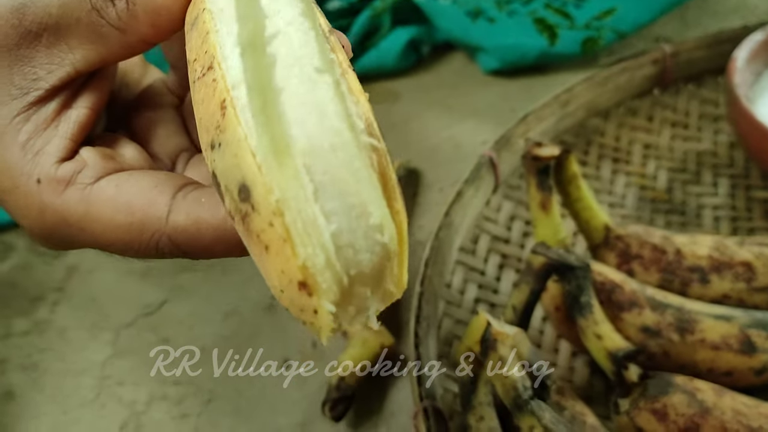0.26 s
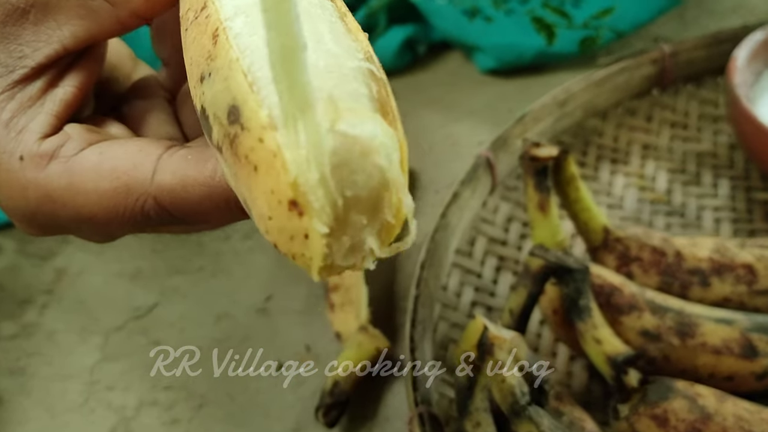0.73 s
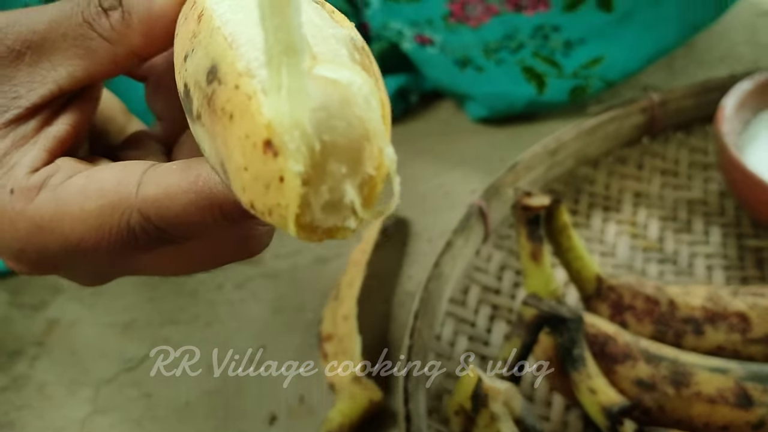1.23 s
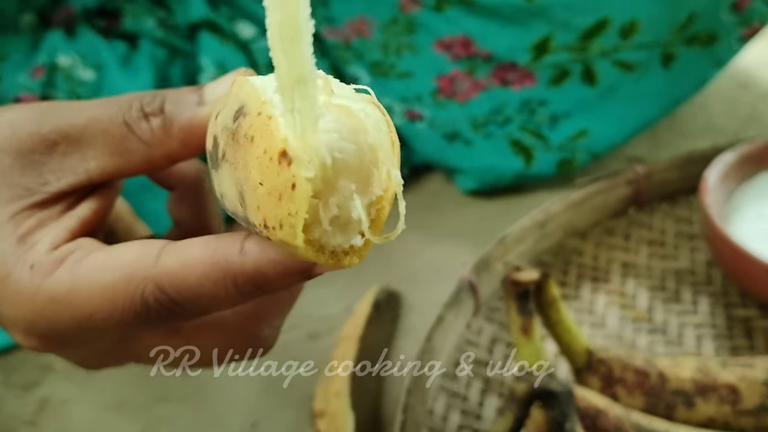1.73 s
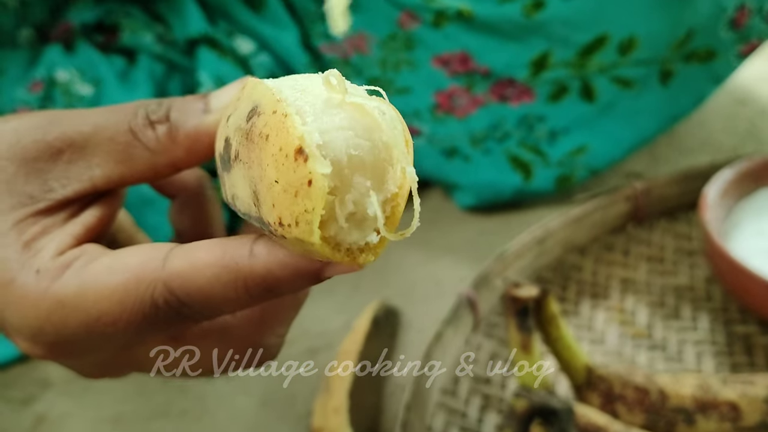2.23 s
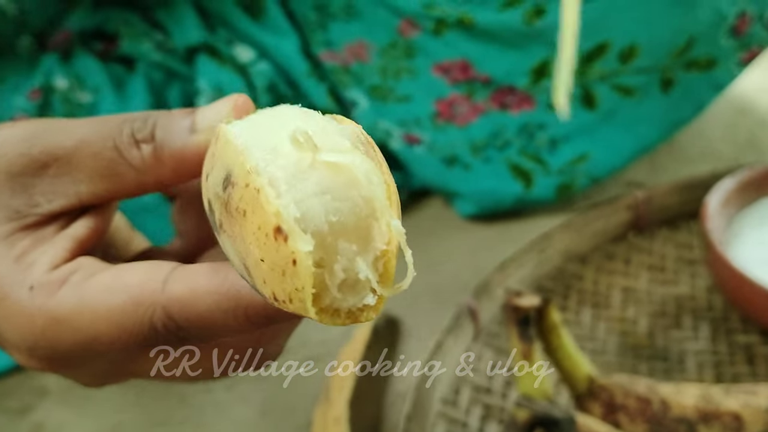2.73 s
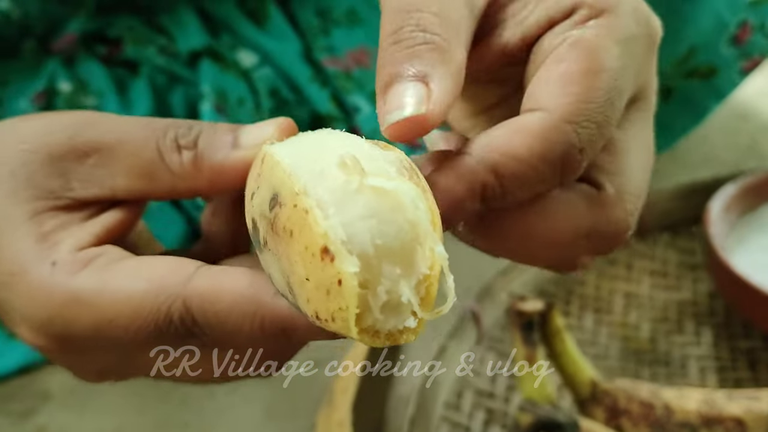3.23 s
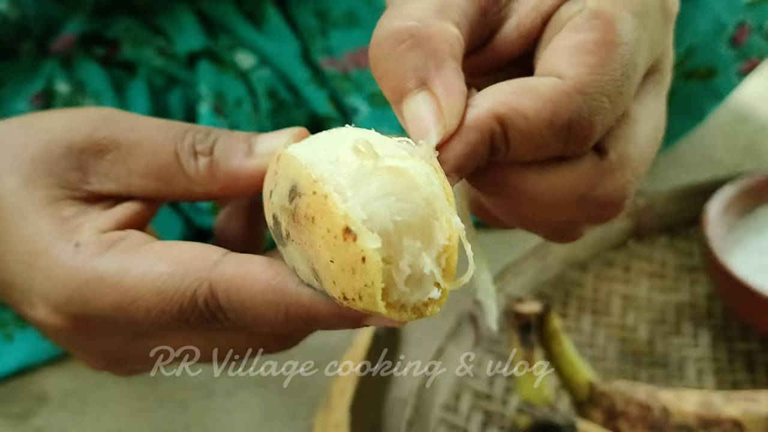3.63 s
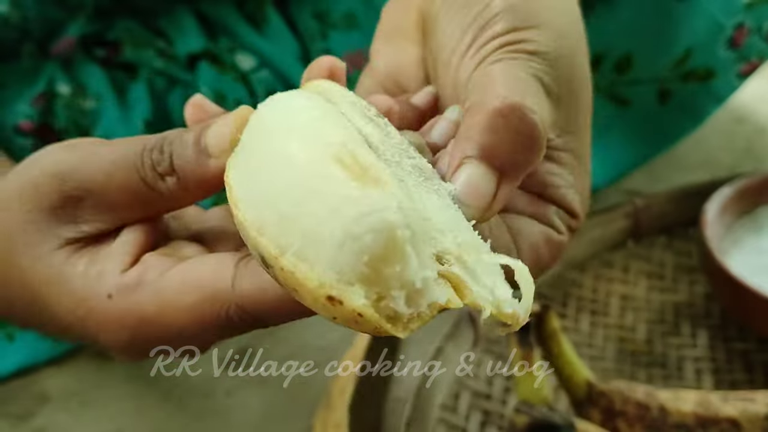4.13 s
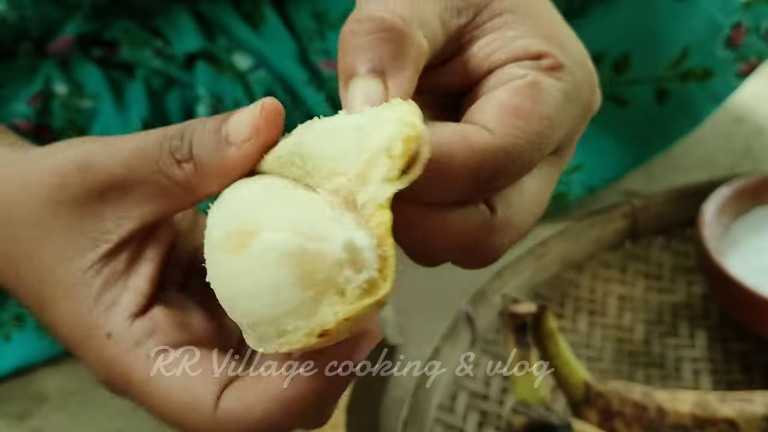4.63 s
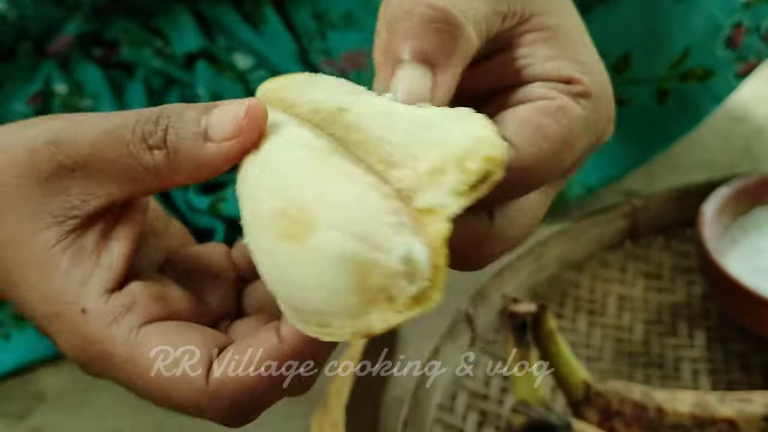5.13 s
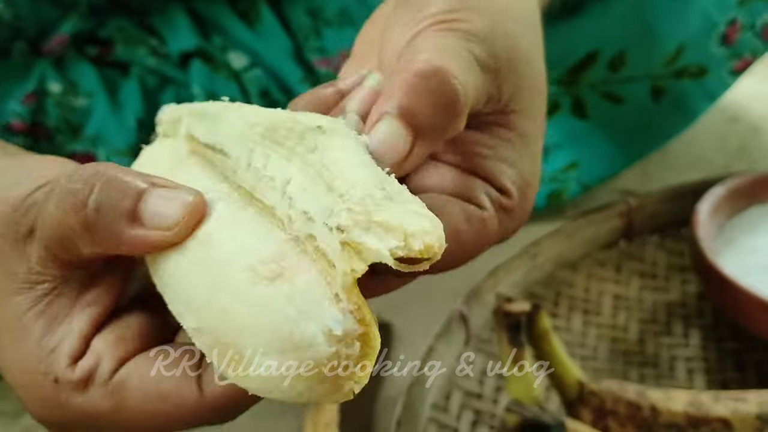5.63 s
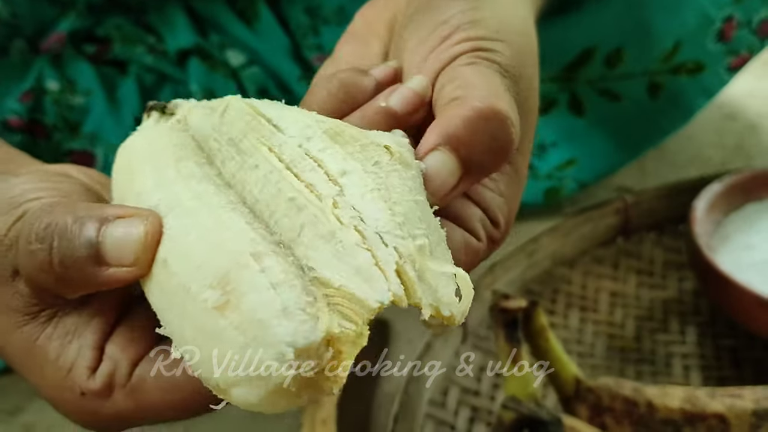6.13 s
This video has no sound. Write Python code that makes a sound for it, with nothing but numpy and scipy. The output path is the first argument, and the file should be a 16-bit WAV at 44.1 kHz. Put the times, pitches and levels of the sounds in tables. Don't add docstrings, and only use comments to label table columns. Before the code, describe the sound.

Faint engine drone under tree and insect hiss; a few sliding bird chirps echo before low gusts buffet the microphone, loudest near the end.

```python
import sys
import numpy as np
from scipy import signal
from scipy.fft import rfft, irfft
from scipy.io import wavfile
from scipy.ndimage import uniform_filter1d, minimum_filter1d

SR = 44100
rng = np.random.default_rng(int(sys.argv[2]) if len(sys.argv) > 2 else 0)


def linear_from_db(decibels):
    return 10 ** (np.asarray(decibels, float) / 20)


def waveform_to_disk(signal):
    frames = np.transpose(np.atleast_2d(signal))
    scaled = np.clip(frames, -1, 1) * 32767
    samples = np.round(scaled).astype(np.int16)
    wavfile.write(sys.argv[1], SR, samples)


N = 280902

# (frequency [Hz], left minus right [dB])
LEFT_LEAN = [(60, -3), (120, 4.5), (240, -2), (490, -0.5), (970, -1.0), (1960, -3), (3930, -7.5),
             (7890, -6.5)]


def evened(x):
    return x / np.sqrt(np.mean(x ** 2, axis=-1, keepdims=True) + 1e-20)


def read(points, hz):
    f, value = np.transpose(points)
    return np.interp(np.log(hz + 1), np.log(f + 1), value)


def along(rows):
    s, *columns = np.transpose(rows)
    return np.array([np.interp(np.arange(N) / SR, s, c) for c in columns])


def shaped(points):
    z = rfft(rng.standard_normal((2, N)))
    closed = points + [(4 * points[-1][0], -150)]
    return evened(irfft(z * linear_from_db(read(closed, np.fft.rfftfreq(N, 1 / SR))), N))


def add(mix, s, sound):
    part = mix[:, round(s * SR):][:, :sound.shape[1]]
    part += sound[:, :part.shape[1]]


def breeze(steady=0.18, quick=1.0, buffet_db=7.5, lumpy_db=3.0):
    # (frequency [Hz], level [dB per Hz])
    thump_colour = [(8, -19.5), (18, -3.5), (38, -7), (62, -4.5), (90, -17), (140, -31), (400, -78.5)]
    buffet_colour = [(35, -24.5), (65, 10), (95, 7.5), (135, 7.5), (220, -32.5)]
    flutter_colour = [(60, -21), (110, -10.5), (160, 5.5), (250, -5), (330, -17), (420, -33.5), (700, -67)]
    fizz_colour = [(120, -21), (230, 4.5), (330, -4), (420, -7.5), (520, -26), (700, -44)]
    # (time [s], level [dB])
    swirl = [(5.6, -69), (5.66, -25.5), (5.72, -30), (5.8, -35), (5.95, -58.5)]
    # (time [s], thump [dB], flutter [dB])
    left_eddies = [(3.22, -21, -33), (3.47, -21.5, -40), (3.69, -25, -44.5), (3.82, -20.5, -37.5),
                   (3.96, -23, -47), (4.12, -19.5, -31.5), (4.3, -34, -43), (4.45, -27, -49),
                   (4.67, -12.5, -47), (4.765, -15, -20), (4.98, -24, -41), (5.12, -17, -42),
                   (5.34, -24, -33.5), (5.5, -16.5, -47), (5.67, -22.5, -37), (5.93, -18.5, -32),
                   (6.11, -18.5, -38), (6.22, -28, -50)]
    right_eddies = [(3.05, -43, -56), (3.3, -18.5, -45), (3.5, -27, -51), (3.69, -26, -55),
                    (3.82, -26, -36.5), (3.96, -22, -45), (4.07, -21.5, -36.5), (4.24, -13, -29.5),
                    (4.36, -16, -32.5), (4.48, -18.5, -29), (4.59, -14.5, -22.5), (4.67, -17, -42),
                    (4.9, -13, -24), (4.98, -17.5, -30.5), (5.12, -17, -24.5), (5.2, -13.5, -36),
                    (5.34, -17.5, -28), (5.42, -11, -30), (5.52, -16.5, -31.5), (5.59, -21.5, -21),
                    (5.68, -26, -31), (5.77, -7.5, -21.5), (5.94, -19.5, -26), (6.04, -16.5, -29.5),
                    (6.13, -15, -39), (6.22, -13, -38.5), (6.31, -14, -51)]

    lumps = uniform_filter1d(rng.standard_normal((2, N)), size=1800)
    lumps = evened(uniform_filter1d(lumps, size=1200))
    left, right = eddies(left_eddies), eddies(right_eddies)
    level_db = np.array([left[0], right[0], left[1], right[1]])
    level_db = level_db + lumpy_db * np.tile(lumps, (2, 1))
    thump_db, flutter_db = level_db[:2], level_db[2:]
    between_db = (1 - quick) * thump_db + quick * flutter_db + buffet_db
    swirl_db = along(swirl) + [[-25], [0]]

    layers = ((thump_colour, thump_db), (buffet_colour, between_db),
              (flutter_colour, flutter_db), (fizz_colour, swirl_db))
    out = np.zeros((2, N))
    for colour, db in layers:
        x = shaped(colour)
        x = x / (uniform_filter1d(x ** 2, size=2200) + .02) ** (steady / 2)
        out += linear_from_db(db) * evened(x)
    blowing = np.interp(np.arange(N) / SR, [3.0, 3.1, 6.33, 6.37], [0, 1, 1, .2])
    return out * blowing


def eddies(rows):
    rise_db_per_s, fall_db_per_s, lull_db = 178, 144.5, -59
    flutter_quicker = 1.46
    s, thump_db, flutter_db = np.transpose(rows)
    t = np.arange(0, N + 64, 64) / SR
    late = t[:, None] - s
    loss_db = np.where(late > 0, late * fall_db_per_s, -late * rise_db_per_s)
    levels = thump_db - loss_db, flutter_db - flutter_quicker * loss_db
    return [np.interp(np.arange(N) / SR, t, np.maximum(db.max(axis=1), lull_db)) for db in levels]


def birds():
    # (slide start [s], slide length [s], top note [Hz], hold level [dB], slide level [dB])
    near_chirps = [
        (1.003, .088, 4790, -21.5, -23),
        (2.626, 0.088, 4560, -19, -23),
        (3.554, 0.096, 4234, -24.5, -24),
        (3.874, 0.047, 3937, -22.5, -18),
        (5.822, 0.086, 4340, -43.5, -31),
    ]
    # (start [s], length [s], from [Hz], to [Hz], level [dB])
    far_peeps = [(3.796, .025, 3010, 2950, -48), (5.004, 0.13, 2870, 2930, -50.5),
                 (5.271, 0.04, 2540, 2438, -40.5), (5.548, 0.045, 3203, 3172, -32.5),
                 (5.582, .036, 3040, 2060, -36), (5.6, 0.068, 3180, 3166, -40),
                 (5.94, .03, 3590, 2980, -30), (5.985, 0.078, 2180, 2020, -45),
                 (6.082, .02, 2756, 2425, -35), (6.098, .07, 2770, 2720, -44),
                 (6.141, .028, 2716, 2290, -39)]
    # (start [s], length [s], pitch [Hz], level [dB], warble [0-1])
    coo_notes = [
        (3.605, .175, 1205, -27.5, .6),
        (3.75, .11, 1495, -33, 0.3),
        (4.341, 0.175, 1205, -27.5, 0.76),
        (4.46, 0.12, 1497, -32.5, 0.33),
    ]
    warble_hz = 83

    out = np.zeros((2, N))
    calls = [chirp(*r) for r in near_chirps]
    calls += [peep(*r) for r in far_peeps]
    calls += [coo(*r) for r in coo_notes]
    for start, hz, db, lean_db, echo_db, warble in calls:
        t = np.arange(len(hz)) / SR
        tone = np.sin(2 * np.pi * np.cumsum(hz) / SR) * linear_from_db(db)
        tone *= 1 - warble + warble * np.sqrt(2) * np.cos(np.pi * warble_hz * t)
        tone *= signal.windows.tukey(len(t), .15)
        lean = linear_from_db(read(LEFT_LEAN, hz.mean()) + lean_db) ** np.array([[.5], [-.5]])
        add(out, start, lean * signal.fftconvolve(tone[None], walls(echo_db), axes=1))
    return out


def chirp(slide_s, length, top_hz, hold_db, slide_db):
    hold_s, hold_rise_db = .014, -6.5
    hold_sag = .1
    break_share, break_s, bend, bottom = 0.15, .005, 1.5, .645
    beak_hz, above_db_per_oct, below_db_per_oct = 3690, -17, -84.5

    t = np.arange(-hold_s, length, 1 / SR)
    after = np.maximum(t, 0)
    high = break_share * np.exp(-after / break_s) + (1 - break_share) * (1 - after / length) ** bend
    high = high - hold_sag * np.minimum(t, 0) / hold_s
    hz = top_hz * (bottom + (1 - bottom) * high)
    octaves = np.log2(hz / beak_hz)
    beak_db = np.where(octaves > 0, above_db_per_oct * octaves, -below_db_per_oct * octaves)
    level_db = np.where(t < 0, hold_db - hold_rise_db * t / hold_s, slide_db + beak_db)
    level_db = uniform_filter1d(level_db, size=150)
    lean_db, echo_db, warble = -1, 1.5, 0
    return slide_s - hold_s, hz, level_db, lean_db, echo_db, warble


def peep(start, length, from_hz, to_hz, db):
    u = np.arange(0, length, 1 / SR) / length
    fade_db, lean_db, echo_db, warble = -4.5, -3.5, -2.5, 0
    return start, from_hz + (to_hz - from_hz) * u, db + fade_db * u, lean_db, echo_db, warble


def coo(start, length, hz, db, warble):
    top, ends_db, lean_db, echo_db = 0.53, -10, 5, -5
    waver_hz, husk_db = 11, 1.5
    u = np.arange(0, length, 1 / SR) / length
    waver, husk = evened(uniform_filter1d(rng.standard_normal((len(u), 2)), size=500, axis=0).T)
    away = np.where(u < top, 1 - u / top, (u - top) / (1 - top))
    level_db = db + husk_db * husk + ends_db * away ** 2.0
    return start, hz + waver_hz * waver, level_db, lean_db, echo_db, np.clip(warble, 0, 1)


def walls(echo_db, far_db=-12.5, leaves=.8):
    hold_s, t60_s = .022, 0.25
    t = np.arange(SR // 2) / SR
    shape = (2, len(t))
    tail = rng.standard_normal(shape) * (rng.random(shape) < .05)
    tail = tail * linear_from_db(-60 * np.maximum(t - hold_s, 0) / t60_s)
    tail = linear_from_db(echo_db) * tail * (t > .004) / np.linalg.norm(tail, axis=1, keepdims=True)
    tail += linear_from_db(echo_db + far_db - 60 * t / 0.99) * rng.standard_normal(shape) / np.sqrt(SR / 20)
    tail += leaves * linear_from_db(echo_db - 10.0) * rng.standard_normal(len(t)) * linear_from_db(-60 * t / 0.0087) / 10
    tail[[0, 1], [0, 14]] = .6
    return tail


def rustle():
    # (time [s], level [dB])
    brush = [
        (6.3, -70),
        (6.34, -53),
        (6.37, -48),
    ]
    skin = shaped([(250, -29.0), (500, -7.0), (900, 5.0), (1400, -1), (2500, -35.5)])
    return linear_from_db(along(brush)) * skin * linear_from_db([[2.0], [-2.5]])


def engine(waver_db=3.0, jitter_hz=0.45):
    # (time [s], speed [turns per second])
    turning = [(0, 30.6), (.6, 31.1), (1.4, 31.9), (2.0, 32.5), (3.1, 32.5), (3.9, 32.2), (4.6, 31.2)]
    # (multiple of the turning rate, level [dB])
    orders = [(1, 3), (2, -0.5), (3, -5.5), (4, -25), (5, -9), (7, -11.5), (8, -23)]
    body_db = 3

    speed = uniform_filter1d(along(turning)[0], size=9000)
    speed = speed + jitter_hz * evened(uniform_filter1d(rng.standard_normal(N), size=1500))
    turns = np.cumsum(speed) / SR
    waver = uniform_filter1d(rng.standard_normal((len(orders), N)), size=9000)
    waver = evened(uniform_filter1d(waver, size=5000))
    body = np.zeros(N)
    for (k, db), w in zip(orders, waver):
        body += linear_from_db(db + waver_db * w) * np.cos(2 * np.pi * (k * turns + rng.random()))
    note_db = exhaust_db() + .4 * waver_db * waver[-1]
    note = np.sqrt(2) * linear_from_db(note_db) * np.cos(2 * np.pi * 6 * turns)
    return linear_from_db(body_db + slow_gain()) * body + note * (np.arange(N) < turning[-1][0] * SR)


def exhaust_db():
    # (start [s], length [s], level [dB])
    carried = [
        (0.032, 0.25, -37.5),
        (0.442, 0.26, -41),
        (0.89, .62, -43.5),
        (1.775, 1.15, -41.5),
        (3.095, .78, -41),
        (4.096, 0.41, -52),
    ]
    edge_s, rest_db = 0.14, -51
    t = np.arange(N) / SR
    swells = []
    for s, length, db in carried:
        inside = np.minimum(t - s, s + length - t)
        swells.append(np.clip(inside / edge_s + .5, 0, 1) * (db - rest_db))
    return rest_db + np.max(swells, axis=0)


def air(patchy_db=1.34):
    # (frequency [Hz], level [dB per Hz])
    yard_colour = [(10, -16.5), (25, -3.5), (65, -5), (140, -13), (260, -19), (400, -28), (700, -30.5),
                   (1200, -29), (1900, -30.5), (3000, -25), (4500, -28), (5700, -24), (7300, -30),
                   (7850, -42)]
    # (centre [Hz], width [Hz], height [dB])
    humps = [(514, 260, 4.5), (864, 160, 4.5), (3050, 230, -0.5), (5810, 350, 2.5)]
    # (frequency [Hz], left-right likeness [-1 to 1])
    likeness = [(60, 1), (100, 1), (180, 0.93), (310, 0.55), (520, 0.67), (900, 0.14), (1550, -0.15),
                (2670, 0.039), (4590, 0.014), (7890, -0.043)]
    air_db = 9.5

    frames, hz = N // 512 + 5, np.fft.rfftfreq(2048, 1 / SR)
    a, b, c, d, patches = rng.standard_normal((frames, 1025, 5)).T
    patches = uniform_filter1d(uniform_filter1d(patches, size=10, axis=0), size=6, axis=1)
    same = np.clip(read(likeness, hz), -1, 1)[:, None]
    left, other = a + 1j * b, c + 1j * d
    z = np.array([left, same * left + np.sqrt(1 - same ** 2) * other])
    lean_db = read(LEFT_LEAN, hz) * np.array([[.5], [-.5]])
    colour_db = read(yard_colour, hz)
    for f, width, db in humps:
        colour_db = colour_db + db / (1 + (2 * (hz - f) / width) ** 2)
    z *= linear_from_db((colour_db + lean_db)[..., None] + patchy_db * patches / patches.std())
    x = signal.istft(z, nperseg=2048, noverlap=1536)[1][:, :N]
    return linear_from_db(air_db) * x / x.mean(0).std()


def slow_gain():
    # (time [s], level [dB])
    closing = [(0, -40), (1.6, -40.5), (2.4, -41.5), (3.2, -41.5), (3.9, -41.5), (4.3, -43), (5.0, -43.5),
               (5.5, -45.5), (5.9, -43.5), (6.37, -44.5)]
    return along(closing)[0]


def duck(loud):
    from_db, share, smooth_s, recover_db_per_s = -32.5, 0.26, 0.056, 89
    power = uniform_filter1d((loud ** 2).mean(0), int(smooth_s * SR))
    power_db = 10 * np.log10(abs(power) + 1e-12)
    fall = np.arange(N) * recover_db_per_s / SR
    held_db = np.maximum.accumulate(power_db + fall) - fall
    over_db = np.maximum(held_db - from_db, 0)
    return linear_from_db(-share * uniform_filter1d(over_db, size=400))


def scene():
    yard = linear_from_db(slow_gain()) * air() + engine()
    loud = breeze() + birds()
    return duck(loud) * yard + loud + rustle()


def roll_off(x):
    return signal.sosfilt(signal.butter(12, 8490, fs=SR, output="sos"), x)


def record(dry):
    gain = np.minimum(.68 / (abs(dry).max(0) + 1e-9), 1)
    gain = minimum_filter1d(gain, size=1300)
    held = dry * uniform_filter1d(gain, size=1300)
    edge = signal.firwin(801, 7830, window=("kaiser", 9), fs=SR)
    mix = signal.oaconvolve(held, edge[None], "same")
    return roll_off(mix)


dry = scene()
out = record(dry)
waveform_to_disk(out)
```